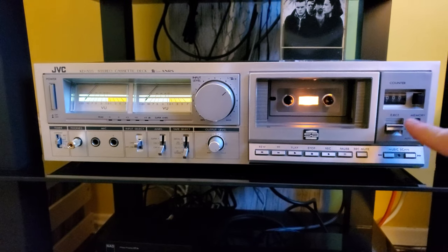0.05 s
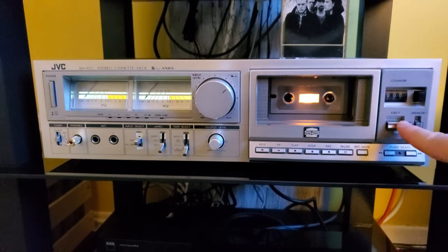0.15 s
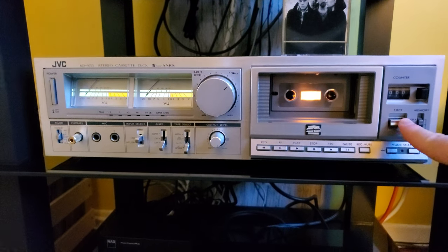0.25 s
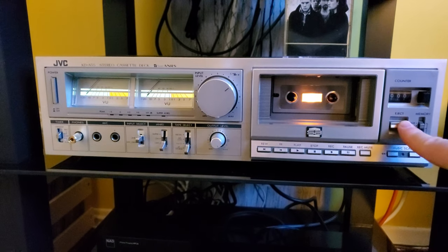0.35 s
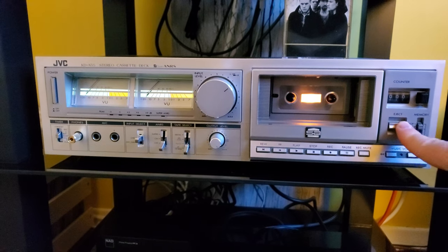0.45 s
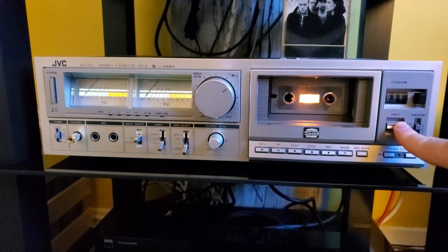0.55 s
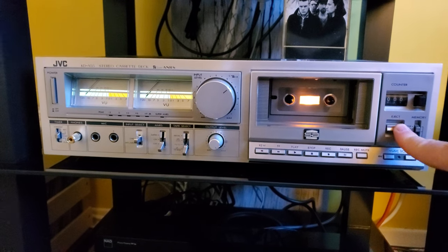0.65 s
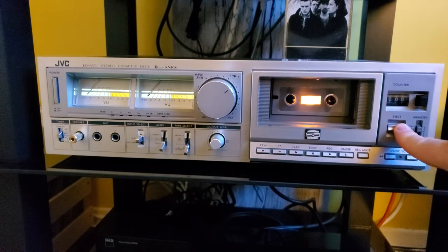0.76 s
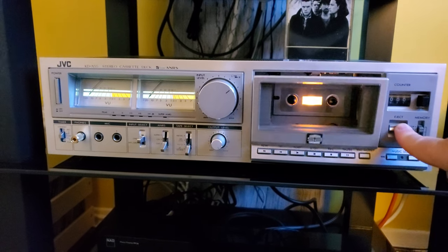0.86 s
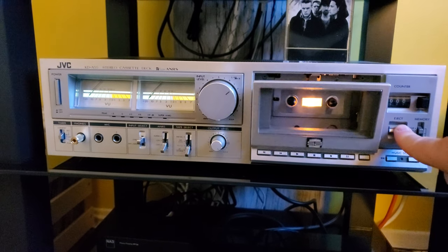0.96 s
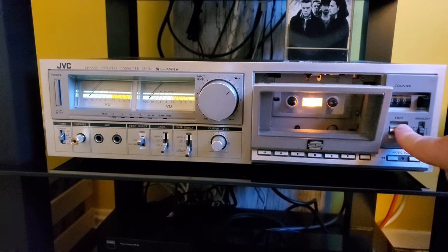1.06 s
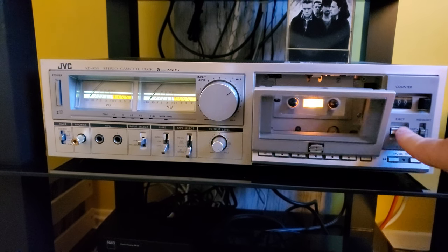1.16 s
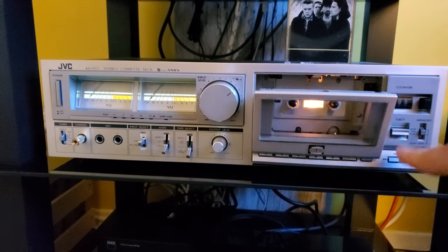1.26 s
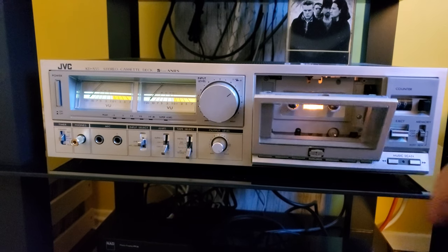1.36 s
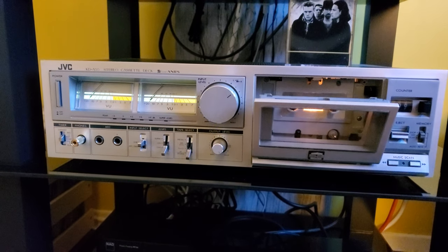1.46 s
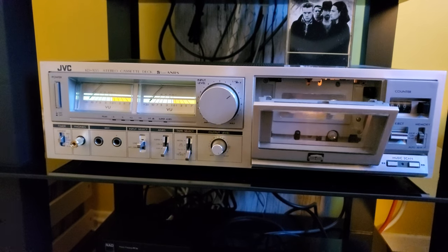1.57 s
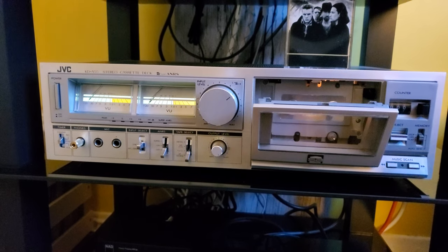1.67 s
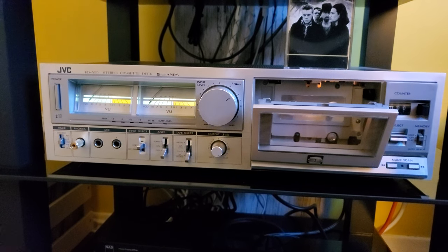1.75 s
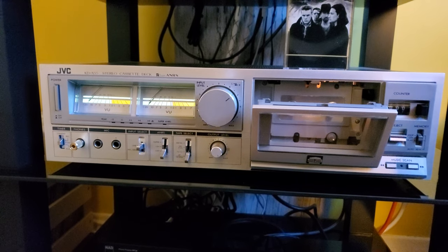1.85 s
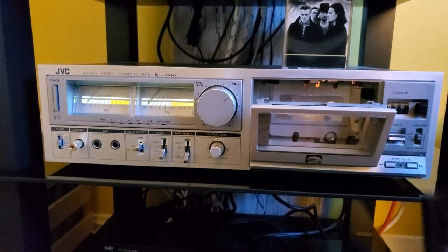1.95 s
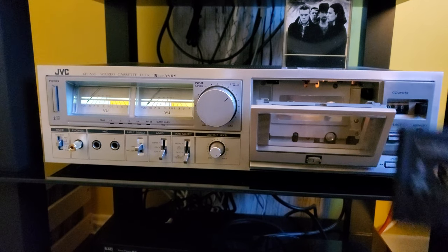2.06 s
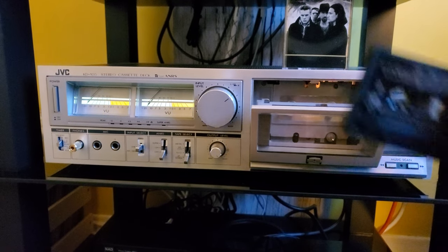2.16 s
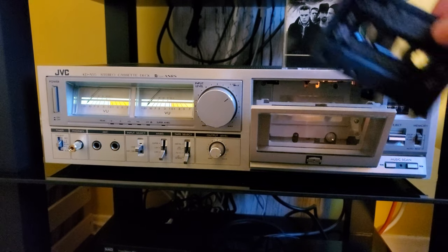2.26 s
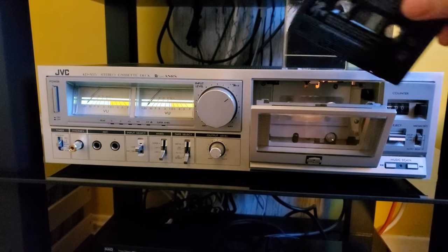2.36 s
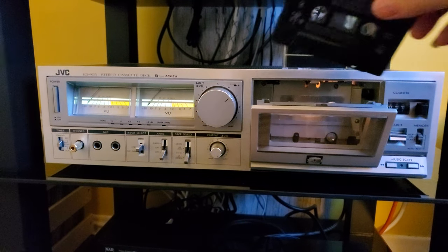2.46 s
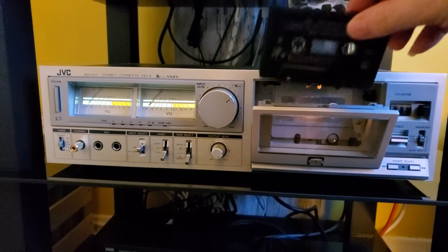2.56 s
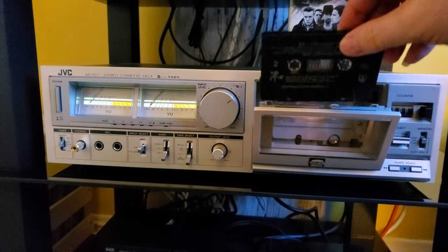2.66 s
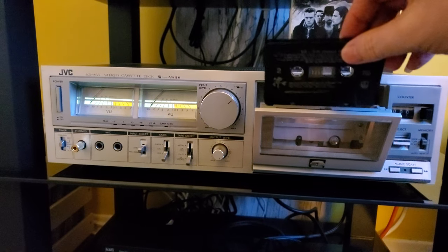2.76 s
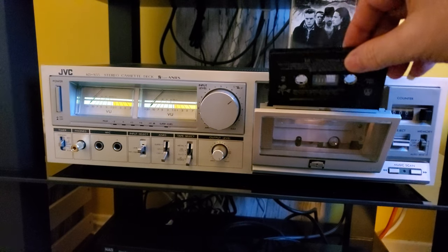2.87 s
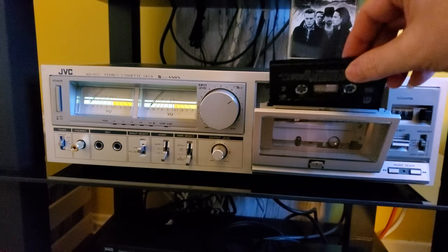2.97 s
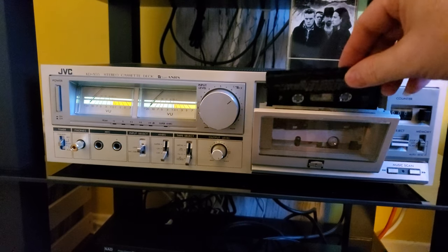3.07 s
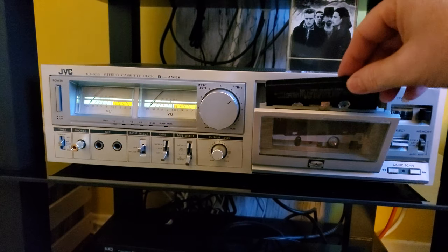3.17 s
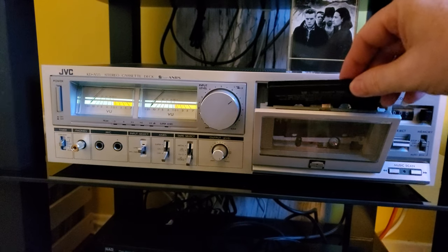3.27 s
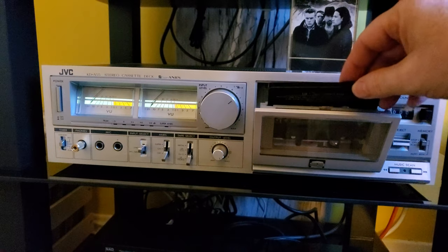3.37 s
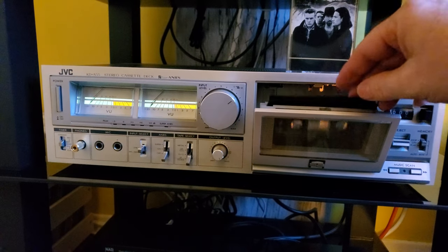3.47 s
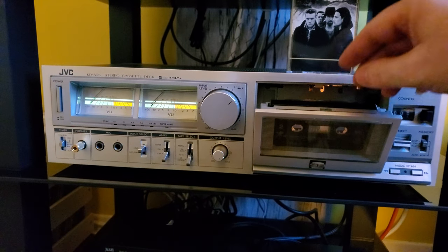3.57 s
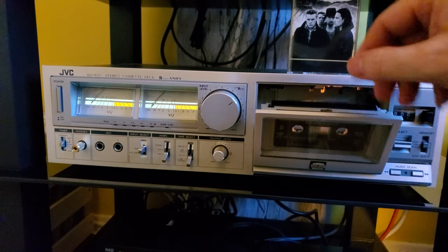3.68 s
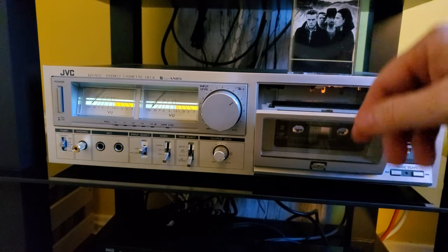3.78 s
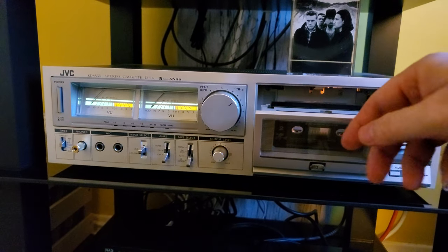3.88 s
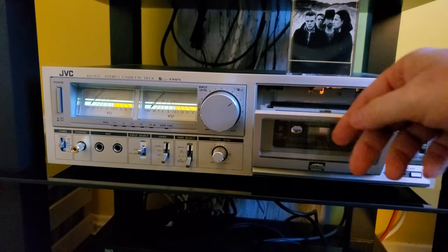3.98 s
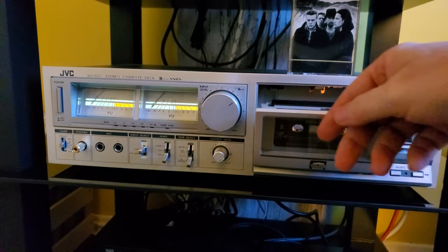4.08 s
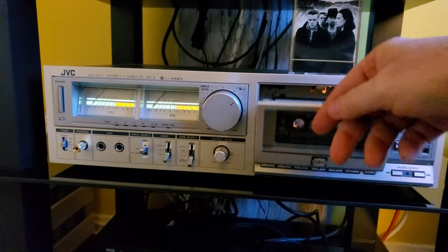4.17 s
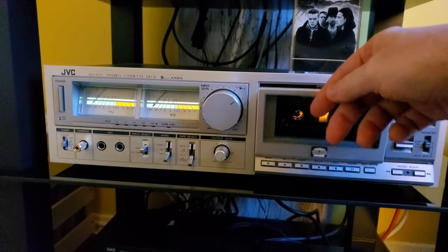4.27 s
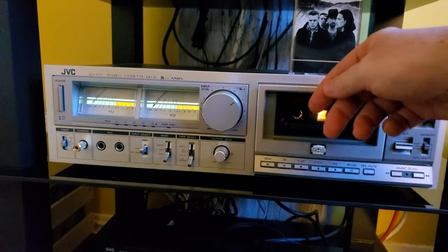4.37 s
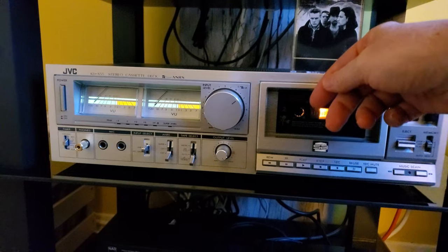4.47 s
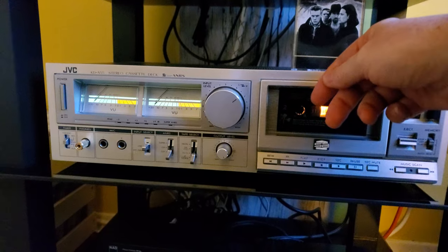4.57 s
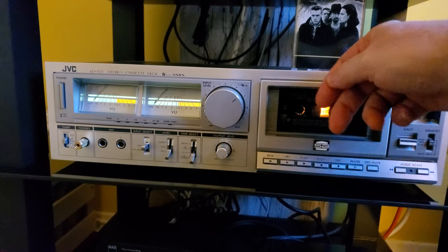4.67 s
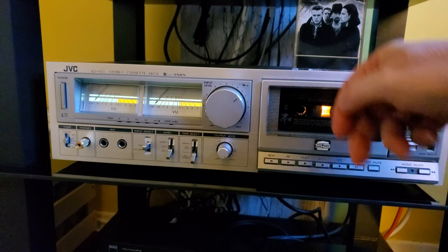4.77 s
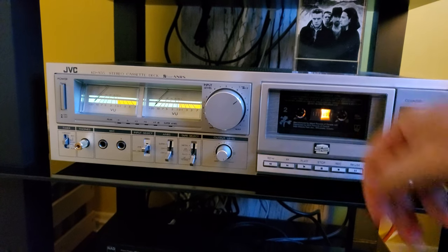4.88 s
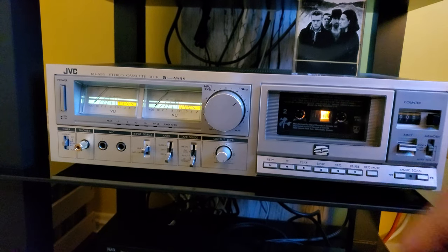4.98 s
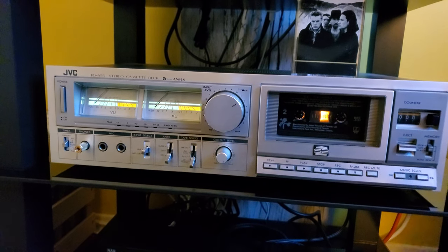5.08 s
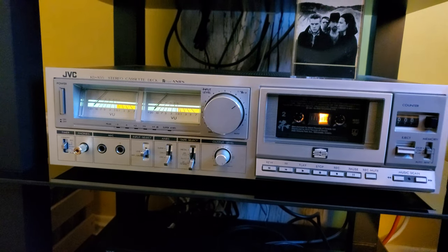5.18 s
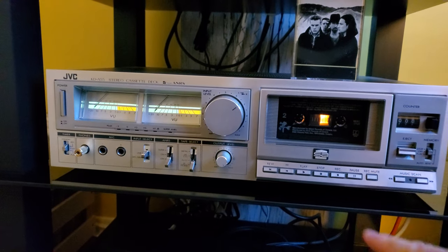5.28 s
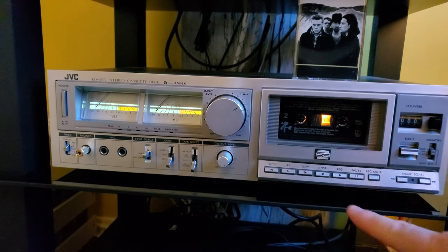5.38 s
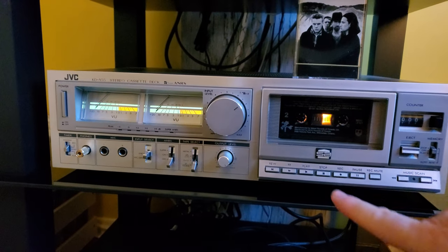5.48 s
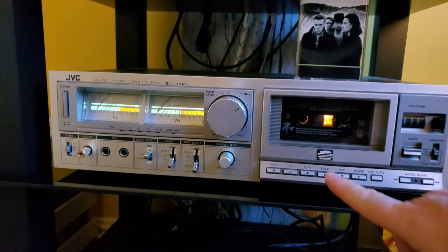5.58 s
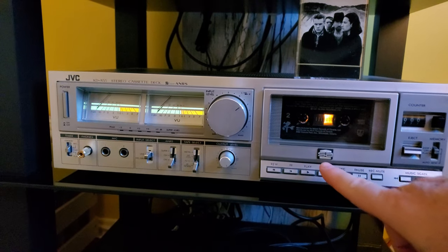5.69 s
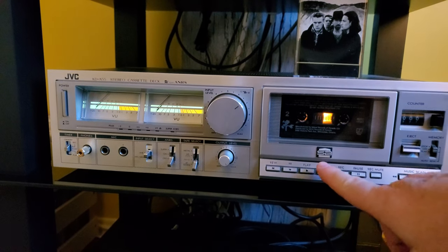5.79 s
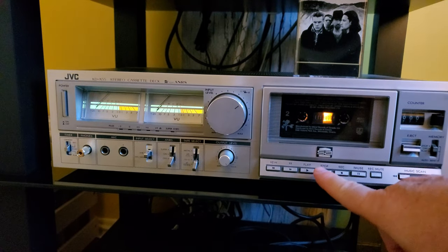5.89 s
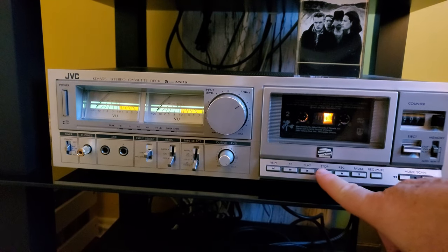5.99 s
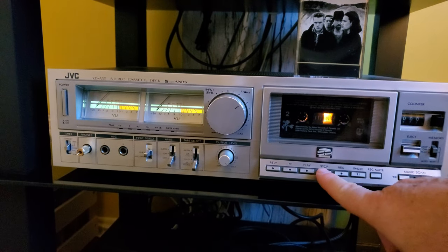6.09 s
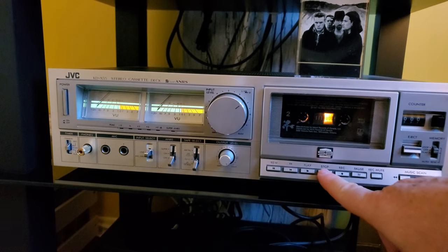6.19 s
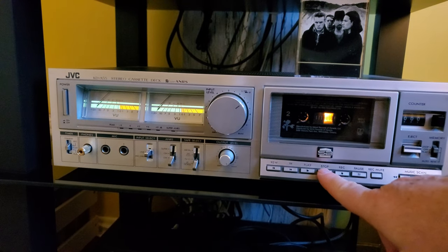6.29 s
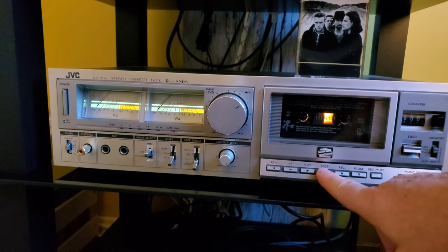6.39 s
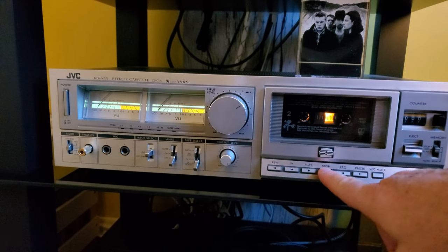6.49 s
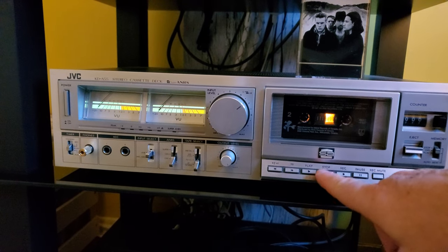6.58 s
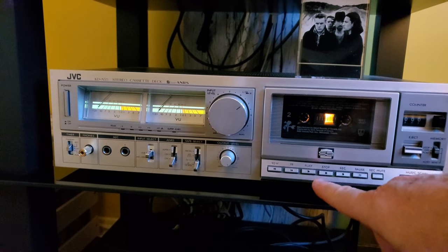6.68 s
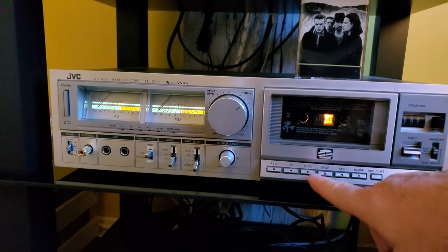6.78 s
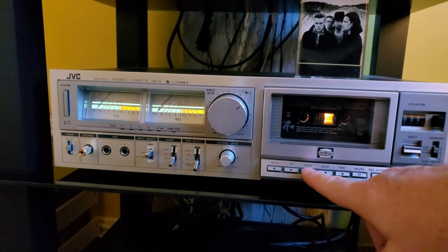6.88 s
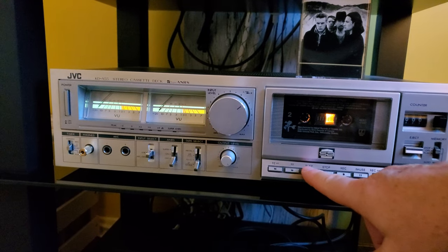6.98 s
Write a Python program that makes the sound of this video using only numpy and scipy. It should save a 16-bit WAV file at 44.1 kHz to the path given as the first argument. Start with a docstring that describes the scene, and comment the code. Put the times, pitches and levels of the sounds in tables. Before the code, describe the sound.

A low steady motor hum with rumble and soft hiss fills a small room throughout. Close to the microphone, a cassette deck's eject key gives sharp clicks at about 0.2 and 0.4 seconds, then a firmer clack at 0.9. The door falls open with a click around 1.2 seconds and a few fading ticks. After a light tap at 2.4 seconds, a plastic cassette scrapes and rattles into the holder from 2.8 seconds, dropping home with a loud clack at 3.6. From about 4.2 seconds the door rubs and clicks as it is pushed, snapping shut loudly at 4.5, with a small after-click. Very faint thin squeaks come from farther off between 5.3 and 6 seconds. A key is touched with two soft clicks at about 6.4 and 6.6 seconds. The clicks carry a short room echo.

```python
"""A far motor hums over low house rumble, hiss and a thin whine in a small room. Close by, on a glass
shelf, a cassette deck's eject key is fingered and pressed and the door falls open. A cassette slides in
and drops home, the door is pushed shut and a key is touched; faint squeaks come from somewhere off.
Impacts and sliding friction excite the resonant modes of lever, shell and door frame, and the room
answers with a short reverberation."""
import sys
import numpy as np
from scipy import signal
from scipy.fft import rfft, irfft, next_fast_len
from scipy.io import wavfile
from scipy.ndimage import uniform_filter1d

SR = 44100
rng = np.random.default_rng(int(sys.argv[2]) if len(sys.argv) > 2 else 0)


def dump_mix(stems):
    """Bounce the given channels to the path in sys.argv[1] as a 16-bit WAV at rate SR."""
    frames = np.atleast_2d(stems).T  # one column per channel
    limited = np.clip(frames, -1, 1)  # hard clip at full scale
    pcm = np.round(limited * 32767).astype(np.int16)
    wavfile.write(sys.argv[1], SR, pcm)


N = 310464


def amp(db):
    return 10 ** (np.asarray(db) / 20)


def unit_rms(x):
    return x / np.sqrt(np.mean(x ** 2) + 1e-20)


def curve_at(points, hz):
    """Interpolation of (frequency, value) points on a logarithmic frequency axis."""
    f, value = np.transpose(points)
    return np.interp(np.log(hz + 1), np.log(f + 1), value)


def filtered(x, response):
    """Linear filtering: the spectrum is multiplied by a frequency response."""
    n = x.shape[-1]
    size = next_fast_len(n + 8192)
    return irfft(rfft(x, size) * response(np.fft.rfftfreq(size, 1 / SR)), size)[..., :n]


def modal_response(modes, f):
    """Modal superposition: damped resonators add with alternating sign."""
    return sum((-1) ** k * amp(db) * 1j * f * width / (hz * hz - f * f + 1j * f * width)
               for k, (hz, width, db) in enumerate(modes))


def resonant_noise(modes, n):
    """Random excitation of narrow resonances gives fuzzy tones."""
    return unit_rms(filtered(rng.standard_normal((2, n)), lambda f: modal_response(modes, f)))


# Likeness of left and right: (frequency [Hz], correlation [-])
COHERENCE = [(60, .985), (130, .965), (200, .93), (290, .72), (640, -.15), (1410, -.25), (3100, -.12),
             (6820, .05), (15000, .05)]
def cohere(pair, spectrum):
    """Spatial coherence: two close microphones hear coloured noise alike in the bass, unrelated above."""
    def response(hz):
        angle = np.arccos(np.clip(curve_at(COHERENCE, hz), -1, 1)) / 2
        return amp(curve_at(spectrum, hz)) * [np.cos(angle), np.sin(angle)]
    mid, side = filtered(pair, response)
    return np.array([mid + side, mid - side])


def noise(spectrum, n):
    return cohere(rng.standard_normal((2, n)), spectrum)


# Motor harmonics, from the fundamental up: (level [dB])
MOTOR_HARMONICS = [-47.5, -58.5, -66, -66.5, -79]
def motor(t, rotation_hz=55.6):
    """Periodic motion radiates a harmonic series."""
    stereo_phase = np.array([[.0556], [-.0556]])
    phases = (2 * np.pi * k * rotation_hz * t + rng.uniform(0, 2 * np.pi)
              for k in range(1, len(MOTOR_HARMONICS) + 1))
    return np.sqrt(2) * sum(amp(db) * np.sin(phase + stereo_phase)
                            for db, phase in zip(MOTOR_HARMONICS, phases))


# House rumble; room air with microphone hiss: (frequency [Hz], spectrum level [dB])
RUMBLE_SPECTRUM = [(20, -37), (42, -29), (55, -14), (68, 1.5), (77, -6.5), (88, -6.5), (108, -13),
                   (120, -9.5), (140, -16), (230, -19), (250, -20.5), (400, -30.5)]
AIR_SPECTRUM = [(180, -30), (300, -9.5), (450, -10.5), (650, -10.5), (885, -17.5), (1170, -22), (2400, -32),
                (3460, -31.5), (5000, -38), (6400, -34.5), (8000, -38.5), (8250, -50.5), (10500, -44.5),
                (12500, -39), (16000, -39)]
# Drift of the hiss: (time [s], level [dB])
AIR_ENVELOPE = [(0, -70.5), (.15, -74.5), (1.5, -75.5), (2.5, -77), (3.9, -76.5), (4.9, -77.5), (7.04, -78)]
# Tones of far machinery: (frequency [Hz], bandwidth [Hz], level [dB])
WHINE_MODES = [(931, 20, -8.5), (1173.6, 18, 0)]
# Stereo balance: (frequency [Hz], left minus right [dB])
BALANCE = [(60, -1.0), (110, 1), (200, -1.5), (380, -4.5), (700, -0.5), (1290, 2), (2380, 0), (4400, -3),
           (8120, 4.5), (15000, -3)]
def background():
    """Superposition: motor, rumble, hiss and whine add to a continuous noise floor."""
    t = np.arange(N) / SR
    rumble = amp(-49.5) * unit_rms(noise(RUMBLE_SPECTRUM + [(900, -120)], N))
    air = amp(12 + np.interp(t, *np.transpose(AIR_ENVELOPE))) * unit_rms(noise(AIR_SPECTRUM, N))
    whine = amp(-80) * resonant_noise(WHINE_MODES, N)
    floor = motor(t) + rumble + air + whine
    return filtered(floor, lambda hz: amp(curve_at(BALANCE, hz) / 2 * np.array([[1], [-1]])))


def noise_bands(spectrum, n):
    """Band splitting: one noise gives four bands of equal power, lowest first."""
    source = noise(spectrum, n)
    edges_hz = [0, 800, 2500, 5000, SR]
    lowpass = lambda hz, edge: 1 / (1 + (hz / (edge + 1)) ** 6)
    return [unit_rms(filtered(source, lambda hz: lowpass(hz, high) - lowpass(hz, low)))
            for low, high in zip(edges_hz, edges_hz[1:])]


def roughness(depth_db, n, window):
    """Random amplitude modulation: a log-normal gain, smoothed over a window of samples."""
    return amp(depth_db * unit_rms(uniform_filter1d(rng.standard_normal(n), size=window)))


def impacts(rows, spectrum, chatter_db, thud_stretch, decay_cycles):
    """Damped free vibration: a blow leaves a rattle of loose parts, a thud and two hollow notes."""
    out = np.zeros((2, N + SR))
    t = np.arange(SR // 5) / SR
    for start, db, thud_db, edge_db, snap_db, t60, rise, pan_db, *notes in rows:
        thud, knock, edge, snap = noise_bands(spectrum, len(t))
        chatter = roughness(chatter_db, len(t), window=40)
        rattle = (knock + amp(edge_db) * edge + amp(snap_db + 8) * snap) * chatter * amp(-60 * t / t60)
        hollow = sum(np.sin(2 * np.pi * hz * t + rng.uniform(0, 2 * np.pi, (2, 1)))
                     * amp(note_db - 60 * t * hz / decay_cycles)
                     for hz, note_db in np.reshape(notes, (2, 2)))
        blow = (rattle + 2 * hollow) * (1 - np.exp(-(t / rise) ** 2))
        blow += thud * amp(thud_db - 60 * t / (t60 * thud_stretch)) * (1 - np.exp(-t / 0.0023))
        gain = amp(db - 5.5 + np.array([[pan_db], [-pan_db]]) / 2)
        out[:, round(start * SR):][:, :len(t)] += gain * blow
    return out[:, :N]


def ringing(force, modes, ring_db):
    """Forced response: a part adds its resonances to whatever strikes or rubs it."""
    return filtered(force, lambda f: 0.84 + amp(ring_db) * modal_response(modes, f))


# Key contacts: (time [s], level [dB], thud [dB], edge [dB], snap [dB], rattle T60 [s], rise [s],
# left minus right [dB], upper note [Hz], its level [dB], lower note [Hz], its level [dB])
# Band and note levels are relative to the contact's level.
KEY_IMPACTS = [(0.199, -32.5, -28, -0.5, -13.5, 0.053, 0.0024, -2, 2630, -8, 760, -20),
               (0.207, -28, -26, -14, -20, 0.039, 0.0023, 2.5, 2640, -8, 540, -21),
               (0.215, -31.5, -32, -3, -18.5, 0.038, 0.0011, 6, 2450, 1, 710, -20),
               (0.357, -57.5, -3, -4, -9, 0.062, 0.0022, 2, 1170, -5, 468, -18),
               (0.386, -47, -5, -7, -12.5, 0.055, 0.0012, 1.5, 2340, -8, 452, -14),
               (0.4, -42, -28, -6, -18, 0.057, 0.0013, 2.5, 2270, -8, 533, -14),
               (0.412, -33.5, -7, -25, -16, 0.064, 0.0017, -4, 2110, -8, 597, -17),
               (0.418, -24.5, -13, -29, -17, 0.047, 0.0013, 2.5, 1800, -12.5, 822, -14),
               (0.43, -32, -8.5, -20, -24.5, 0.033, 0.0017, -5, 2500, -4, 830, -10),
               (0.871, -27, -24, -28, -21, 0.045, 0.00076, -3.5, 2210, -8, 456, -13),
               (0.875, -26.5, -1.5, -11, -17, 0.05, 0.0033, -3, 1225, 0, 744, -14),
               (0.892, -21, -32, -1.5, -7.5, 0.045, 0.001, 2, 1740, -10, 936, -15),
               (0.902, -28, -26, -1, -23, 0.045, 0.00096, 0.5, 2170, -12, 760, -21),
               (1.175, -33, -28, -7, -3.5, 0.072, 0.0019, 2.5, 1340, -5, 660, -22),
               (1.203, -27.5, -13, -10, -25.5, 0.066, 0.0019, 1.5, 1250, -10.5, 692, -19),
               (1.299, -38.5, 0.5, -12, -23, 0.047, 0.00098, 1.0, 990, -5, 700, -14),
               (1.314, -44.5, 3, -4, -22, 0.045, 0.0011, -5, 2100, -6, 700, -7),
               (1.506, -59.5, -14, -1, -8.5, 0.032, 0.0013, -1.5, 1320, -8, 678, -11),
               (1.611, -66.5, -2.5, -6, -7, 0.038, 0.0014, -1, 1270, -10, 541, -14),
               (1.641, -69, 0, -13, -4.5, 0.045, 0.0015, -3.5, 1200, -5, 595, -14),
               (1.825, -70, 1, 6.5, -11, 0.045, 0.0016, -9, 1180, -8, 452, -13),
               (6.378, -49, -4, -19, -20, 0.045, 0.0015, 5.5, 1880, -5, 455, -10),
               (6.592, -50.5, -21, -3, -11, 0.042, 0.0011, 8, 1930, 3, 460, -23),
               (6.602, -44, -10, -13, -9.5, 0.049, 0.0012, 4, 2340, -8, 606, -16)]
# Lever colour: (frequency [Hz], spectrum level [dB])
LEVER_SPECTRUM = [(180, -41), (300, -25), (528, -10.5), (1460, -4.5), (1580, -6), (2280, 1), (3700, -2),
                  (4830, -8), (5430, -8.5), (7570, -9), (9880, -27.5), (15000, -20), (16000, -23)]
# Lever resonances: (frequency [Hz], bandwidth [Hz], level [dB])
LEVER_MODES = [(722, 110, -5), (1876, 30, 7), (2160, 44, -11), (2550, 40, 4), (3926, 120, -19.5),
               (4150, 27, 7), (4745, 44, -17.5), (4770, 65, 14), (6490, 150, -3), (6950, 34, -5.5),
               (7240, 58, -19.5), (8900, 490, -8.5)]
def keys():
    """Impact excitation: each contact rings the modes of the key lever."""
    blows = impacts(KEY_IMPACTS, LEVER_SPECTRUM, chatter_db=3.5, thud_stretch=2.67, decay_cycles=83)
    return ringing(blows, LEVER_MODES, ring_db=-0.5)


# Squeaks: (time [s], duration [s], level [dB], mode set [index, rounded down])
SQUEAK_EVENTS = [(1.685, .07, -78, 0.022), (1.764, 0.047, -76, 0), (5.3, 0.11, -65.5, 1),
                 (5.381, .13, -77, 1), (5.65, 0.078, -81, 2.6), (5.852, .055, -80, 2.4),
                 (5.95, 0.063, -71, 2.5)]
# Three sets of resonances: (frequency [Hz], bandwidth [Hz], level [dB])
SQUEAK_MODES = [
    [(6400, 500, -5), (7060, 400, -7)],
    [(2370, 24, 6.5), (2800, 380, -4.5), (3300, 400, -6), (3650, 79, 0), (4100, 110, -3), (4510, 80, -5),
     (6900, 910, -21)],
    [(2030, 48, -2), (2350, 40, 3), (2850, 33, -8), (3940, 32, -3)],
]
def squeaks():
    """Narrow-band resonance turns short bursts of noise into thin squeaks."""
    out = np.zeros((2, N))
    for start, duration, db, mode_set in SQUEAK_EVENTS:
        n = round(duration * SR)
        tone = resonant_noise(SQUEAK_MODES[int(mode_set)], n)
        out[:, round(start * SR):][:, :n] += amp(db) * tone * signal.windows.tukey(n, .4)
    return out


def friction(strokes, spectrum, grit_db):
    """Sliding friction: plastic in its guides makes gritty noise over a hollow drone."""
    out = np.zeros((2, N))
    for rows in strokes:
        times, *levels = np.transpose(rows)
        start, end = round(times[0] * SR), round(times[-1] * SR)
        t = np.arange(start, end) / SR
        scrape, drone, rasp, hiss = (amp(np.interp(t, times, db)) for db in levels)
        low, mid, high, top = noise_bands(spectrum, len(t))
        grit = unit_rms(roughness(grit_db, len(t), window=160))
        rub = drone * low + grit * (scrape * mid + rasp * high + hiss * top)
        out[:, start:end] += amp(-4.5) * signal.windows.tukey(len(t), .06) * rub
    return out


# Cassette contacts: columns as in KEY_IMPACTS
CASSETTE_IMPACTS = [(2.361, -51, -25.5, -14, -1, 0.029, 0.0023, -4.5, 1155, -2, 479, -16),
                    (2.46, -61, 5, -5, -12.5, 0.045, 0.0032, 0, 990, -10, 495, -19),
                    (2.811, -27, -3, -10.5, -33, 0.024, 0.0016, -6, 1230, -8.5, 544, -19.5),
                    (2.819, -30, -17, -31, -32, 0.035, 0.003, 10, 1150, -12, 600, -20),
                    (2.858, -35.5, -3.5, -10, -20.5, 0.037, 0.003, 0.5, 1270, 4, 554, -6),
                    (2.916, -32, -6, -32, -17.5, 0.037, 0.003, 0.5, 1236, 5, 797, -9),
                    (3.05, -27, -7, -13.5, -26.5, 0.034, 0.003, 1.5, 1212, -7, 676, -14),
                    (3.067, -29.5, -5.5, -6, -28.5, 0.042, 0.003, 1.0, 1060, -6.5, 807, -14),
                    (3.086, -26, -10.5, -23, -22, 0.039, 0.0061, -1, 1160, -8, 729, -15),
                    (3.097, -24, -11.5, -12.5, -20.5, 0.019, 0.0021, 2.5, 1128, -5, 592, -14),
                    (3.181, -37, -10.5, -2.5, -16.5, 0.031, 0.003, 0.5, 1218, -3, 587, -13.5),
                    (3.194, -48.5, -7, -2.5, -13, 0.038, 0.0036, 1, 1220, -7, 592, -16),
                    (3.21, -45, -4.5, -9, -16.5, 0.027, 0.0047, 0.5, 1287, -10, 517, -13.5),
                    (3.225, -45.5, -9.5, -26, -17, 0.035, 0.003, 0.5, 1140, -7.5, 503, -13),
                    (3.36, -37.5, -0.5, -31.5, -38.5, 0.023, 0.0024, 2, 1289, -1.5, 603, -15),
                    (3.436, -44.5, -24.5, -3.5, -8.5, 0.032, 0.0035, 0, 3790, -9, 608, -13.5),
                    (3.448, -37, -16.5, -10, -6.5, 0.045, 0.0051, -1, 3870, -8, 563, -17),
                    (3.47, -39, -14, -2.5, -9, 0.051, 0.0066, -1.5, 1258, -9.5, 762, -13),
                    (3.514, -24, -20.5, -10.5, -12.5, 0.041, 0.0037, 1.5, 2848, -8, 584, -11.5),
                    (3.57, -4.5, -16, -10.5, -18, 0.059, 0.001, 3, 1148, -13.5, 735, -15.5),
                    (3.583, -13, -13.5, -18.5, -26.5, 0.026, 0.0028, -4, 1941, -3.5, 581, -15.5),
                    (3.61, -18, -20.5, -8.5, -21.5, 0.054, 0.0025, 1.0, 1282, -7, 740, -16),
                    (3.627, -21, -23.5, -17.5, -27.5, 0.061, 0.0017, 3, 1123, -20, 743, -25),
                    (3.644, -30.5, -14.5, -12.5, -21.5, 0.033, 0.0038, -1.5, 1210, -6, 595, -14)]
# Sliding, one list a stroke: (time [s], scrape [dB], drone [dB], rasp [dB], hiss [dB])
CASSETTE_STROKES = [
    [(2.82, -49, -52, -56, -74), (2.834, -66, -56, -76, -72), (2.91, -48, -51, -65, -67.5),
     (2.92, -62, -57, -75, -63.5), (2.944, -79, -47, -70, -73.5), (3.02, -59, -45.5, -81, -72.5)],
    [(3.02, -55, -46.5, -61, -69), (3.048, -37, -44, -53, -63), (3.076, -47, -45, -49, -61),
     (3.098, -36, -41, -40.5, -50), (3.13, -54, -51.5, -81, -70.5)],
    [(3.13, -68.5, -51.5, -59, -68.5), (3.166, -56, -54.5, -67, -73.5), (3.19, -56.5, -51, -52, -60),
     (3.232, -58.5, -57, -71, -69.5), (3.296, -74.5, -63.5, -82.5, -89), (3.3, -72, -65, -75, -80.5)],
    [(3.41, -76.5, -64, -76.5, -85.5), (3.454, -57, -65, -53, -51), (3.46, -61, -60, -57, -56.5),
     (3.502, -58, -62, -55, -56.5), (3.51, -54.5, -57.5, -43.5, -51)],
    [(3.51, -49, -57, -40.5, -47.5), (3.52, -39.5, -46, -38.5, -45.5), (3.558, -50.5, -53, -45.5, -46),
     (3.57, -21.5, -34, -22, -28.5)],
]
# Shell colour: (frequency [Hz], spectrum level [dB])
SHELL_SPECTRUM = [(76, -45), (130, -19.5), (190, -10.5), (250, -31.5), (400, -11), (600, -6.5), (900, -6.5),
                  (1200, -1), (2800, -4), (4000, -9), (7800, -14), (8800, -29), (12000, -24.5),
                  (15500, -23.5)]
# Shell resonances: (frequency [Hz], bandwidth [Hz], level [dB])
SHELL_MODES = [(182, 30, -1.5), (284, 54, 8.5), (371.3, 7.9, 11.5), (486, 21, 2.5), (583.5, 20, 3.5),
               (762, 27, 7.5), (1230, 160, 0), (1450, 14, 0.5), (1547, 17, -4), (2000, 34, -1.5),
               (2360, 50, -7), (2880, 97, 8), (3420, 160, 1), (3740, 90, 6), (5870, 43, 4), (7450, 30, -4),
               (7730, 100, -2)]
def cassette():
    """Sustained excitation: slow rubbing brings out the shell's modes more than a blow does."""
    blows = impacts(CASSETTE_IMPACTS, SHELL_SPECTRUM, chatter_db=4, thud_stretch=2.2, decay_cycles=35)
    slide = friction(CASSETTE_STROKES, SHELL_SPECTRUM, grit_db=3)
    return ringing(blows, SHELL_MODES, ring_db=-1) + ringing(slide, SHELL_MODES, ring_db=4)


# Door contacts: columns as in KEY_IMPACTS
DOOR_IMPACTS = [(4.004, -58.5, -9.5, -14, -6, 0.05, 0.002, 1.5, 990, -9, 552, -13),
                (4.012, -53, -12.5, -4, -17, 0.05, 0.0017, 1, 1147, -4, 452, -13),
                (4.065, -50, 7.5, -20, -29.5, 0.045, 0.0022, -12, 1907, -9, 528, -13),
                (4.079, -55, 5.5, -13.5, -22.5, 0.043, 0.002, 0.5, 1103, -9, 482, -12.5),
                (4.252, -29.5, -11, -21, -27, 0.045, 0.002, 2, 1128, -6.5, 711, -12),
                (4.301, -31, -7.5, -16.5, -18, 0.043, 0.002, 3.5, 1210, -7, 947, -13),
                (4.308, -38, -12.5, -24, -15, 0.05, 0.002, 4, 1211, -9, 708, -13.5),
                (4.36, -23.5, -7.5, -18.5, -17, 0.045, 0.0018, -1, 1250, -4.5, 686, -9),
                (4.374, -22.5, -22.5, -18, -21.5, 0.05, 0.002, 0.5, 1264, -8, 684, -12),
                (4.393, -13, -27, -20, -21.5, 0.05, 0.002, 1.5, 1133, -7.5, 767, -13),
                (4.458, -1.5, -16, -8, -9.5, 0.046, 0.0018, 0.5, 1411, -10.5, 738, -14),
                (4.468, -8, -9.5, -4.5, -15.5, 0.046, 0.002, 6, 1249, -10, 493, -14.5),
                (4.488, -9.5, -23.5, -13.5, -19, 0.05, 0.0023, 3.5, 1349, -8.5, 487, -15.5),
                (4.694, -36, -7.5, -18.5, -16.5, 0.045, 0.002, 11, 1253, 2, 557, -15),
                (4.707, -35, -6, -16, -13, 0.042, 0.0017, -3, 1280, -2, 778, -13)]
# Rubbing as the door swings: columns as in CASSETTE_STROKES
DOOR_STROKES = [
    [(4.14, -74, -68.5, -82, -79.5), (4.218, -80.5, -73, -85.5, -75), (4.26, -46.5, -53.5, -57.5, -63.5),
     (4.294, -62, -60, -73, -76.5), (4.3, -45.5, -48.5, -55, -56.5), (4.35, -56, -52.5, -66, -72)],
    [(4.35, -51, -50, -59.5, -70.5), (4.364, -40, -44, -53.5, -49.5), (4.39, -30.5, -45, -40, -42.5),
     (4.442, -38.5, -43.5, -50.5, -58.5), (4.457, -19, -36, -21, -22)],
]
# Frame colour: (frequency [Hz], spectrum level [dB])
FRAME_SPECTRUM = [(65, -41), (130, -11.5), (250, -15), (480, -7), (950, -12), (1300, -7), (2200, -3.5),
                  (3300, -6), (4200, -10), (7800, -11.5), (8900, -27), (12000, -24.5), (15500, -17.5)]
# Frame resonances: (frequency [Hz], bandwidth [Hz], level [dB])
FRAME_MODES = [(155, 34, -2), (293, 18, 2.5), (363, 5.3, 4), (490, 39, 7), (610, 100, -9.5),
               (767.3, 15, 10), (1170, 60, 0), (1310, 66, 4), (1470, 44, -2.5), (1670, 50, -3),
               (2178, 38, -10), (2330, 40, 0.5), (3126, 50, 0.5), (4760, 60, -5.5), (6640, 45, 1),
               (7200, 230, -0.5)]
def door_closing():
    """Impact and friction drive the same modes of the door frame."""
    blows = impacts(DOOR_IMPACTS, FRAME_SPECTRUM, chatter_db=3, thud_stretch=1.7, decay_cycles=35)
    swing = friction(DOOR_STROKES, FRAME_SPECTRUM, grit_db=2.5)
    return ringing(blows + swing, FRAME_MODES, ring_db=-2)


# Reverberation time: (frequency [Hz], T60 [s])
ROOM_T60 = [(150, .5), (600, 0.3), (2000, 0.29), (5000, 0.27), (10000, 0.24)]
def room(x, delay_samples=130):
    """Reverberation: each frequency decays at its own rate; the source moves, so tails change each 0.1 s."""
    out = np.zeros((2, N + 2 * SR))
    step = SR // 10
    for start in range(0, N, step):
        hz, t, spectra = signal.stft(rng.standard_normal((2, SR * 3 // 5)), SR, nperseg=256)
        decay = amp(-60 * t / curve_at(ROOM_T60, hz)[:, None])
        tail = signal.istft(spectra * decay, SR, nperseg=256)[1]
        tail = cohere(tail, [(100, 0.17), (16000, -1.2)])
        mono = x[:, start:start + step].mean(0, keepdims=True)
        wet = signal.fftconvolve(mono, tail / np.linalg.norm(tail[0]), axes=1)
        out[:, start + delay_samples:][:, :wet.shape[1]] += wet
    return out[:, :N]


def scene():
    """Direct and diffuse fields: the deck is heard in both, the squeaks only by reverberation."""
    deck = keys() + cassette() + door_closing()
    return deck + amp(-2.5) * room(deck + 2 * squeaks()) + background()


def record(dry, ceiling=.95, cutoff_hz=15950):
    """Soft saturation rounds the loudest peaks; a low-pass filter limits the band."""
    rounded = dry / (1 + np.abs(dry / ceiling) ** 4) ** (1 / 4)
    return filtered(rounded, lambda hz: hz < cutoff_hz)


dry = scene()
out = record(dry)
dump_mix(out)
```